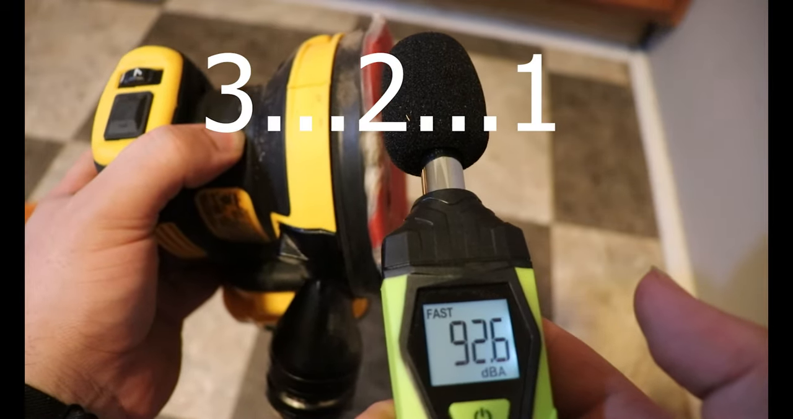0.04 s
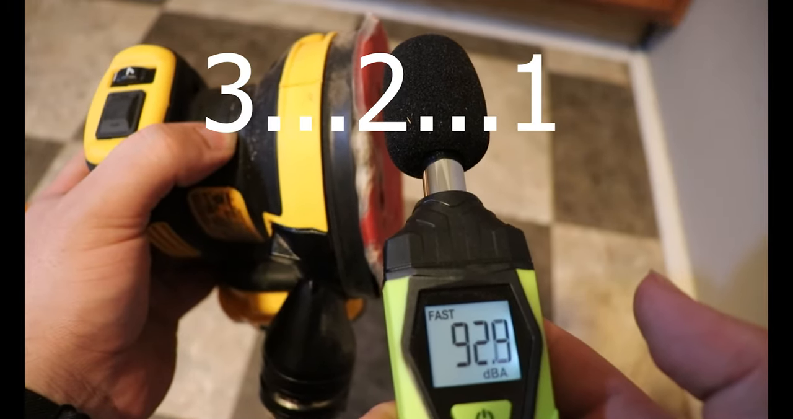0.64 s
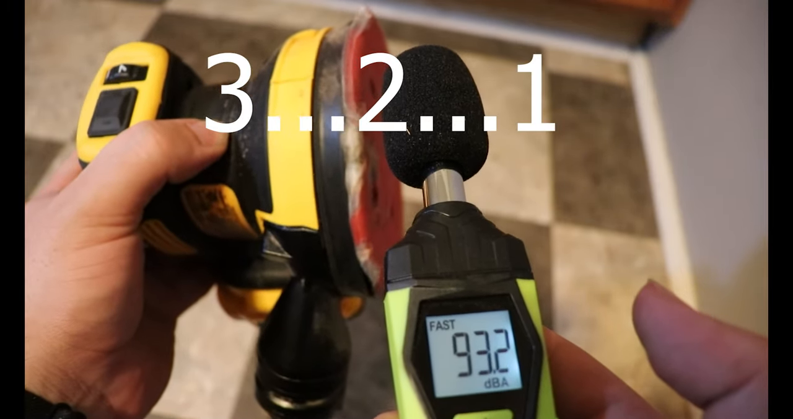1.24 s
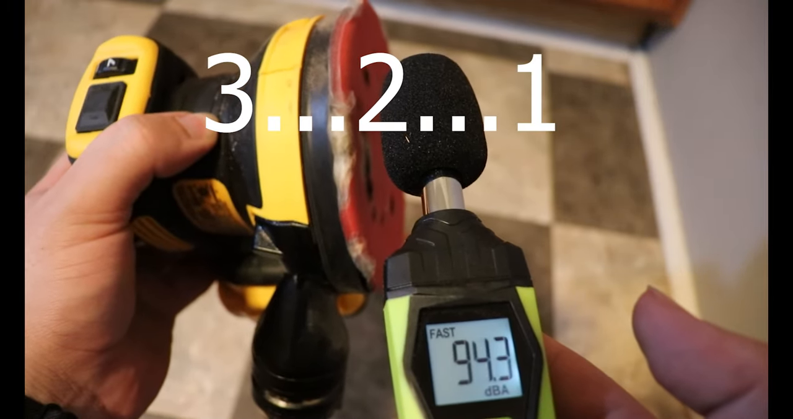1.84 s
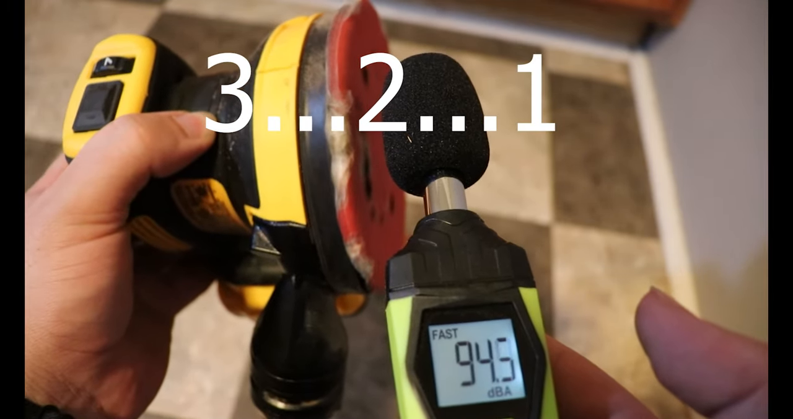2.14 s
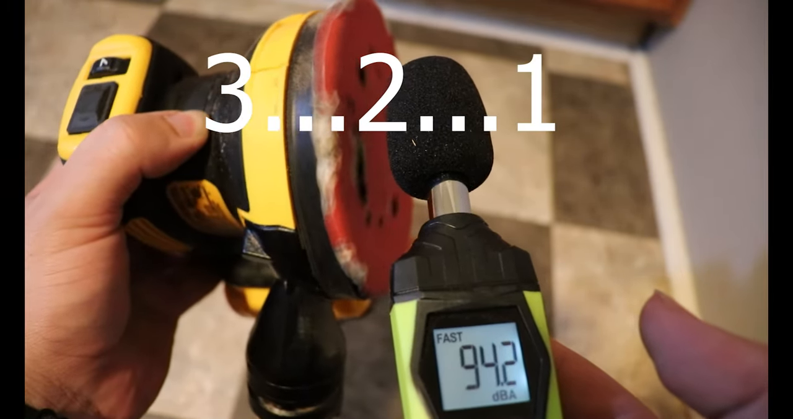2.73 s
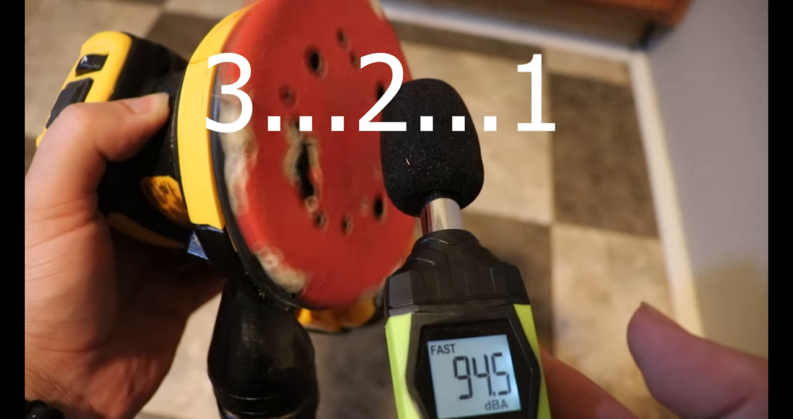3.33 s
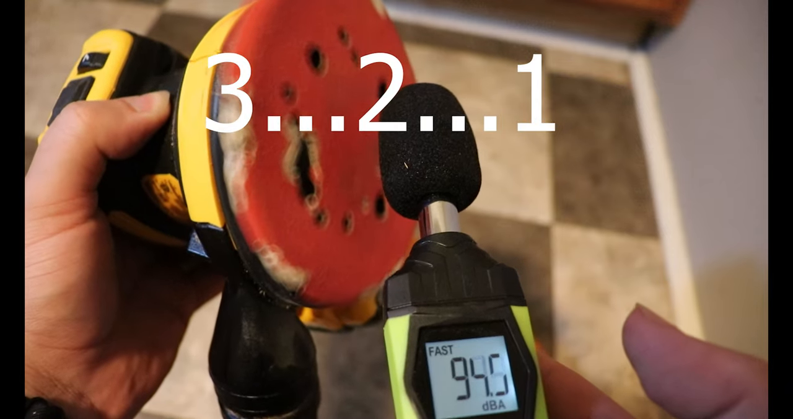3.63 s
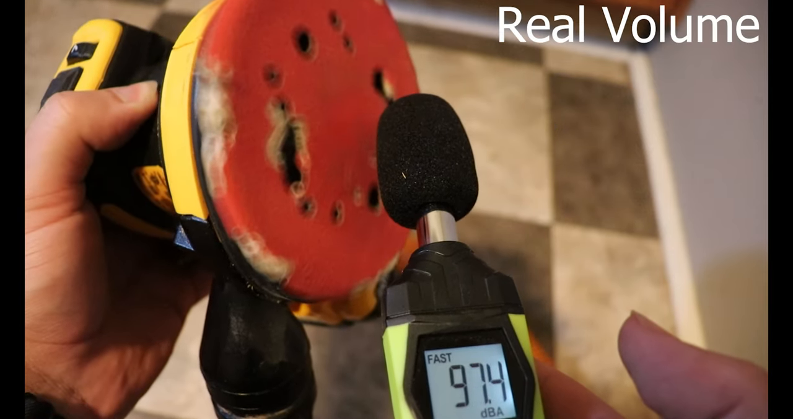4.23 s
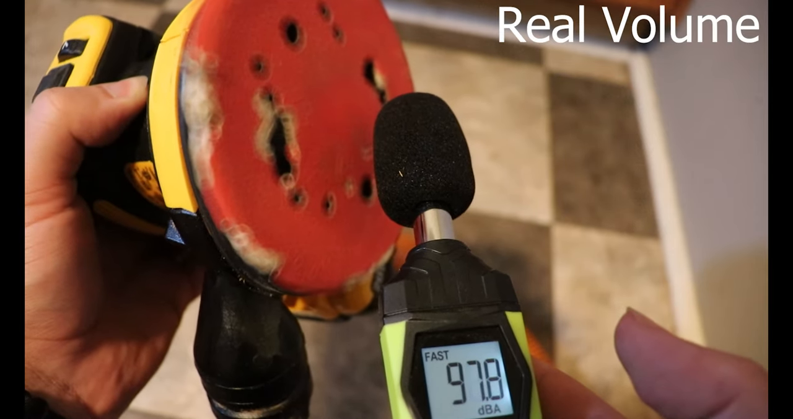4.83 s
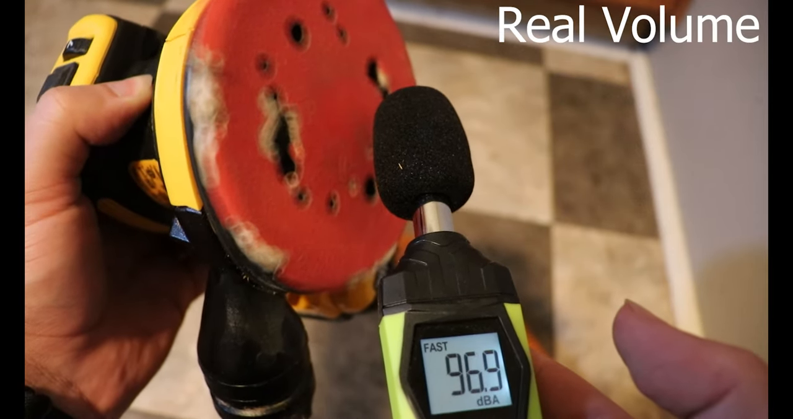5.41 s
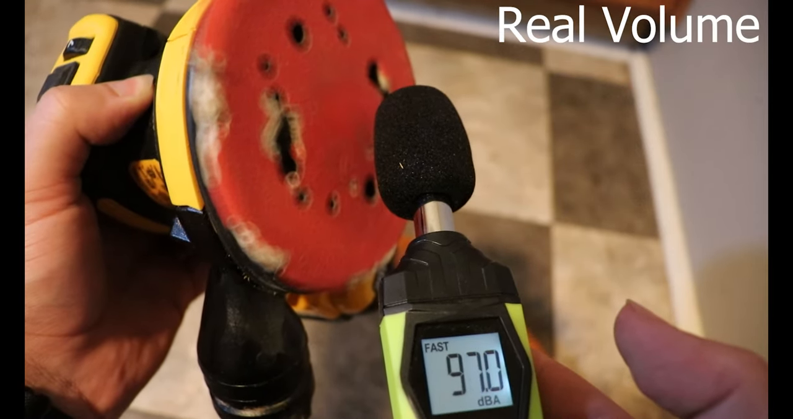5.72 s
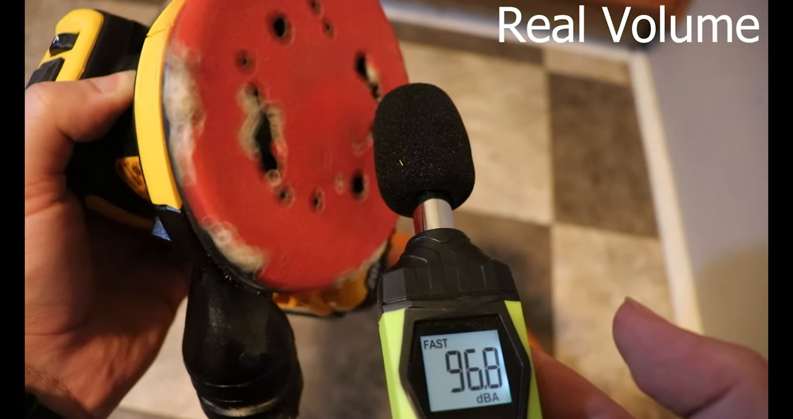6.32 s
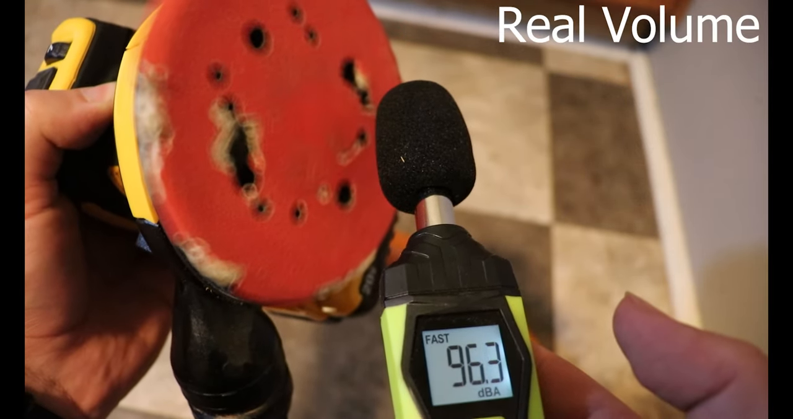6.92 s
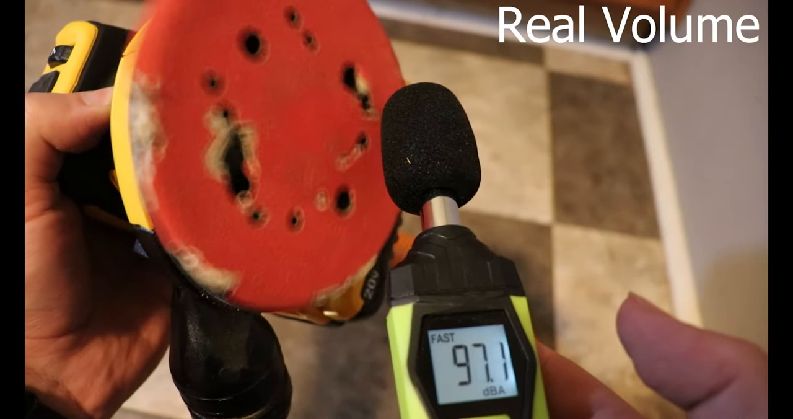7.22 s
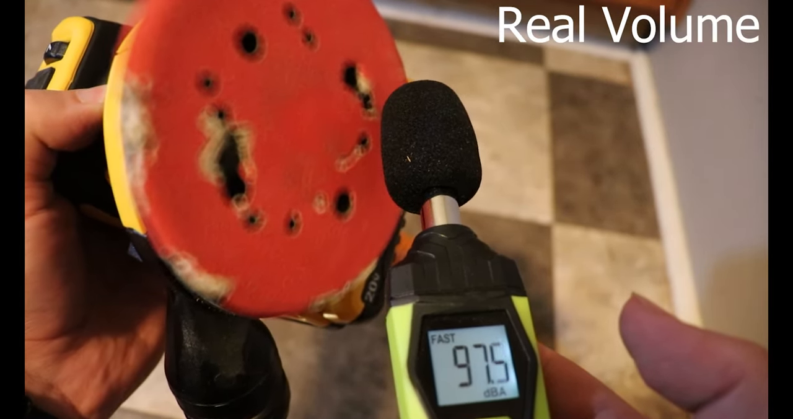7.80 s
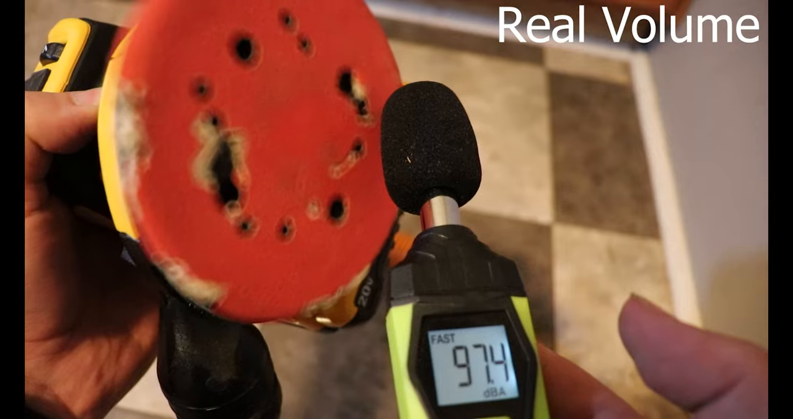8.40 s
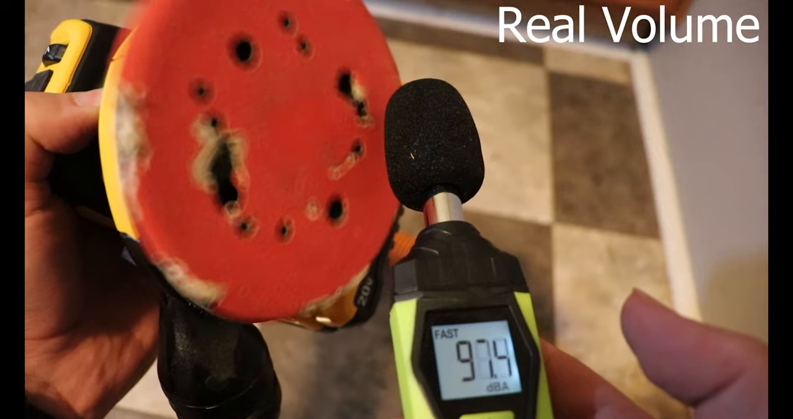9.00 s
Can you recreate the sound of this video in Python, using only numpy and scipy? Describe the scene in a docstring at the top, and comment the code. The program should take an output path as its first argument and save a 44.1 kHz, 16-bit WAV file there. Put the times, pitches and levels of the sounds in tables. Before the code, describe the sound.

A handheld electric orbital sander is already running at full speed, held in the air close to the microphone, with no sanding contact. The sound is a steady, fairly low motor hum with buzzy overtones, a thin high fan whistle and a constant rush of cooling air. For the first four seconds it is quiet, easing down a little more over the opening second or two. Between about 2 and 4 seconds the tool is slowly turned, so the whistle softens and the tone shifts slightly between left and right. At about 4.2 seconds the volume jumps abruptly to loud, while the speed and pitch stay the same. The sander then keeps up its full, even buzz and airy hiss, with only slight wavering, until the end at about 9 seconds. There is very little room echo.

```python
"""A handheld orbital sander runs free at full speed, close by, its pad nearly edge-on and the volume low.
Cooling air rushes through the housing, bearings and fan buzz, and the eccentric weight hums once a turn.
Over the first seconds the tool settles back in the hand and is slowly turned; each harmonic of the shaft
has its own directivity, so the colour shifts. After about four seconds the volume jumps to full,
and the sander runs on until its pad faces us."""
import sys
import numpy as np
from scipy import signal
from scipy.fft import rfft, irfft
from scipy.io import wavfile

SR = 44100
rng = np.random.default_rng(int(sys.argv[2]) if len(sys.argv) > 2 else 0)


def to_wav(s):
    """Save 16-bit WAV."""
    ch = np.atleast_2d(s).T  # columns
    pcm = np.round(np.clip(ch, -1, 1) * 32767)  # PCM
    wavfile.write(sys.argv[1], SR, pcm.astype(np.int16))


N = 403511
SHAFT_HZ = 180.5  # turns per second at the start


def amp(db):
    """Amplitude ratio of a level in decibels."""
    return 10 ** (np.asarray(db) / 20)


def spectrum_at(rows, hz, column=1):
    """Interpolation of one table column on a logarithmic frequency axis."""
    table = np.transpose(rows)
    return np.interp(np.log(hz + 1), np.log(table[0] + 1), table[column])


def resonance_db(modes, hz):
    """Resonance: each mode adds a bell-shaped peak or dip to the level."""
    return sum(db / (1 + (2 * (hz - centre) / width) ** 2) for centre, width, db in modes)


def drift(rate_hz, size=2048):
    """Low-pass random fluctuation of rms 1, with little above the given rate."""
    hz = np.arange(size // 2 + 1) * SR / N
    slow = irfft(rfft(rng.standard_normal(size)) * (hz > 0) / (1 + (hz / rate_hz) ** 2))
    return np.interp(np.linspace(0, size - 1, N), np.arange(size), slow / slow.std())


def ear_gains(balance_db, lead_rad=0):
    """Interaural level and phase differences, as complex left and right gains of mean power 1."""
    left = amp(balance_db / 2) * np.exp(.5j * lead_rad)
    pair = np.array([left, 1 / left])
    return pair / np.sqrt(np.mean(abs(pair) ** 2, axis=0))


def early_reflections(wet_db=-14, first_s=.004, last_s=.025, count=8):
    """Interference: echoes from floor, walls and hands ripple the spectrum."""
    taps = np.zeros(N)
    strengths = rng.choice([-1, 1], count) / np.sqrt(count)
    taps[(SR * rng.uniform(first_s, last_s, count)).astype(int)] = strengths
    return (1 + amp(wet_db) * rfft(taps)) / np.hypot(1, amp(wet_db))


# Spectral density of the fan's turbulence: frequency_hz, level_db
TURBULENCE = [(25, -82.1), (60, -78), (130, -70.5), (230, -64.5), (262, -73), (310, -61.5), (460, -66),
              (560, -58.5), (950, -59.5), (2650, -59.5), (5200, -56.5), (7500, -64.5), (10500, -73.0),
              (15400, -82.5)]
# Air resonances and dips of housing and dust port: centre_hz, width_hz, gain_db
HOUSING_MODES = [(670, 163, 5), (1050, 140, 4.5), (1313, 188, 11.5), (1450, 63, 3.5), (1546, 208, 16.0),
                 (1723, 205, 2), (2060, 547, 11.1), (3336, 770, 7), (3913, 285, 2), (4720, 580, 1.5),
                 (5731, 250, -1.5), (8600, 710, 1.7)]
# Resonances and dips of the side vents, heard edge-on: centre_hz, width_hz, gain_db
VENT_MODES = [(412, 60, 6.5), (720, 58, 6), (1261, 90, -7), (1941, 140, 6), (4538, 592, -3),
              (4890, 469, 2.5)]
# The rush at the two ears (balance is left minus right):
# frequency_hz, coherence_ratio, left_lead_rad, edge_on_balance_db, facing_balance_db
INTERAURAL = [(100, .82, .15, 2, .8), (350, 0.93, -0.14, 2.5, 5), (694, 0.92, -.1, 3, 1),
              (1130, 0.6, -0.49, -1, 3), (1300, 0.78, 0.21, 5, -2.5), (1530, 0.82, 0.037, -9, -2),
              (2000, 0.7, 0.5, -4, -1.5), (2740, 0.2, 1.5, -2.2, -0.5), (3400, 0.38, 1.04, -4, 1),
              (5000, 0.31, 0.93, 0, 2), (8000, 0, .7, -0.5, 1.5), (12000, 0, 1, .8, 2)]


def air_rush(angle, turn, pulse_depth=0.038, gust_db=0.47, gust_hz=14):
    """Source and filter: fan turbulence, pulsing slightly each revolution, excites the housing's modes."""
    hz = np.fft.rfftfreq(N, 1 / SR)
    coherence, lead, edge_db, facing_db = (spectrum_at(INTERAURAL, hz, column) for column in (1, 2, 3, 4))
    noise = rng.standard_normal((2, N)) * (1 + pulse_depth * np.cos(angle))
    left, independent = rfft(noise) * np.sqrt(SR / 2)
    right = coherence * left + np.sqrt(1 - coherence ** 2) * independent
    rush = np.array([left, right]) * amp(spectrum_at(TURBULENCE, hz) + resonance_db(HOUSING_MODES, hz))
    vents = amp(resonance_db(VENT_MODES, hz))
    # each pose has its own echoes and its own balance between the ears
    edge_on = irfft(rush * early_reflections() * ear_gains(edge_db, lead) * vents, N)
    facing = irfft(rush * early_reflections() * ear_gains(facing_db, lead), N)
    return ((1 - turn) * edge_on + turn * facing) * amp(gust_db * drift(gust_hz))


# Spectral envelope of the high shaft harmonics: frequency_hz, level_db
BUZZ_ENVELOPE = [(5000, -35.5), (6300, -41), (7300, -49), (8300, -46.5), (9200, -53), (11000, -56),
                 (13000, -56), (15500, -66)]


def bearing_buzz(angle, waver_db=3.5, waver_hz=0.45, scatter_rad=1.64, last_order=85):
    """Decorrelation: the bearing tick's short waves reach each ear with their own strength and phase."""
    out = np.zeros((2, N))
    for order in range(len(FACING_HARMONICS) + 1, last_order + 1):
        for ear in out:
            level_db = spectrum_at(BUZZ_ENVELOPE, order * SHAFT_HZ) + waver_db * drift(waver_hz)
            ear += amp(level_db) * np.cos(order * angle + scatter_rad * rng.standard_normal())
    return out


# Low shaft harmonics with the pad edge-on: order, level_db, balance_db, left_lead_rad
EDGE_ON_HARMONICS = [(1, -15.5, -0.5, 0.1), (2, -24.5, 7, -0.5), (3, -33.5, 6, -6), (4, -23.5, -2, 0),
                     (5, -28, 6, 0.4), (6, -21, -1, 1.33), (7, -16.5, 4, 0.48), (8, -25.5, -2, 1),
                     (9, -14, -6, 0.4), (10, -12.5, -10, 3.5), (11, -15, -5, -1.5), (12, -25.5, -8, 1.5),
                     (13, -34, -3.5, 3), (14, -29.5, 0, 0.5), (15, -33, 8, 2), (16, -25.5, -8, 2.1),
                     (17, -26, -5, 4.5), (18, -39, 0, -2.5), (19, -23, -5, 0), (20, -17.5, 8, 0.4),
                     (21, -27, 12.6, 11), (22, -31, 1.3, -5.5), (23, -34, 6.4, 0), (24, -31, -1, -11.5),
                     (25, -30, -1, -1), (26, -29, -13, 1), (27, -37, -4.8, -0.5)]
# The same harmonics with the pad facing us: order, level_db, balance_db, left_lead_rad
FACING_HARMONICS = [(1, -18, 3.5, 0.4), (2, -25.5, 6.1, 0.42), (3, -30.5, 3, 0.05), (4, -39, 4, 1),
                    (5, -24.5, -1, 0.14), (6, -19.5, 1.5, -0.7), (7, -20, 25, -2.5), (8, -23.5, -19, 0.84),
                    (9, -21.5, -3, 2.5), (10, -24, 0, 0.5), (11, -28.5, -7.9, 0.3), (12, -28.5, 7, 3.1),
                    (13, -32, 1, 1.5), (14, -31, -12, 2), (15, -28.5, 3, 1), (16, -29, -9, -2),
                    (17, -20.5, 10.5, 2.5), (18, -24, 7, -2), (19, -28, 8, 0.4), (20, -28.5, 8, -1),
                    (21, -27, 9, 2.5), (22, -36, 4, 4), (23, -29.5, -8, 2), (24, -31.5, 8, 0.7),
                    (25, -31.5, 5.3, 0.5), (26, -29, -4, 2.5), (27, -31, 8, 1.7)]


def shaft_hum(angle, turn, waver_db=1.5, waver_hz=0.9, flutter_depth=0.085, flutter_hz=18,
              scatter_rad=1.3, blades=20, beam_turn=0.61):
    """Directivity: each harmonic of weight and fan beams its own way, so turning changes the colour."""
    out = np.zeros((2, N))
    for edge_on, facing in zip(EDGE_ON_HARMONICS, FACING_HARMONICS):
        order, edge_db, edge_balance_db, edge_lead = edge_on
        _, facing_db, facing_balance_db, facing_lead = facing
        pose, unsteadiness = turn, min(order / 10, 1)  # the lowest orders are the steadiest
        if order == blades:  # the firm blade whistle leaves the vents in a beam that misses us past beam_turn
            pose, unsteadiness = 1 - np.exp(-(turn / beam_turn) ** 4), .4
        edge_gain = amp(edge_db) * abs(ear_gains(edge_balance_db))
        facing_gain = amp(facing_db) * abs(ear_gains(facing_balance_db))
        gain = np.outer(edge_gain, 1 - pose) + np.outer(facing_gain, pose)
        lead = edge_lead + pose * np.angle(np.exp(1j * (facing_lead - edge_lead)))  # the shorter way round
        waver = amp(unsteadiness * waver_db * drift(waver_hz))
        flutter = 1 + unsteadiness * flutter_depth * drift(flutter_hz)
        # higher orders scatter less in phase and bunch into a tick each revolution
        phase = order * angle + scatter_rad * blades / order * rng.standard_normal()
        out += gain * waver * flutter * np.cos(phase + np.outer([.5, -.5], lead))
    return out


def shaft_angle(creep_hz_per_s=.11, wander_hz=.12, wander_rate_hz=.6, jitter_hz=0.062, jitter_rate_hz=12):
    """Phase is the integral of speed, which creeps up as the motor warms, wanders and trembles."""
    speed_hz = SHAFT_HZ + creep_hz_per_s * np.arange(N) / SR
    speed_hz += wander_hz * drift(wander_rate_hz) + jitter_hz * drift(jitter_rate_hz)
    return 2 * np.pi * np.cumsum(speed_hz) / SR


# How far the pad is turned, from 0 edge-on to 1 facing us: time_s, turn_fraction
PAD_TURN = [(0, 0.21), (1.0, 0.26), (2.0, 0.3), (2.7, 0.48), (3.3, 0.75), (4.2, 0.87), (5.5, 0.91),
            (9.15, 1)]


def scene(motor_db=-0.74, motor_turn_db=1.0, air_db=-0.13, air_turn_db=-0.2, near_db=4, settle_s=1.4):
    """Superposition: one shaft drives every layer, and the pad's turn sets their colour and balance."""
    time_s = np.arange(N) / SR
    turn = np.interp(time_s, *np.transpose(PAD_TURN))
    angle = shaft_angle()
    motor = amp(motor_db + motor_turn_db * turn) * (shaft_hum(angle, turn) + bearing_buzz(angle))
    rush = amp(air_db + air_turn_db * turn) * air_rush(angle, turn)
    nearness = amp(near_db * np.exp(-time_s / settle_s))  # the tool starts closer and settles back
    return nearness * (rush + motor)


def record(dry, quiet_db=-21.5, jump_s=4.2209, cutoff_hz=15730):
    """Gain, clipping and band limit: the volume jumps to full, the highest peaks clip, the top is cut."""
    volume = np.where(np.arange(N) < jump_s * SR, amp(quiet_db), 1)
    low_pass = signal.firwin(1023, cutoff_hz, window=("kaiser", 9), fs=SR)
    return signal.oaconvolve(np.clip(dry * volume, -1, 1), low_pass[None], "same")


dry = scene()
out = record(dry)
to_wav(out)
```